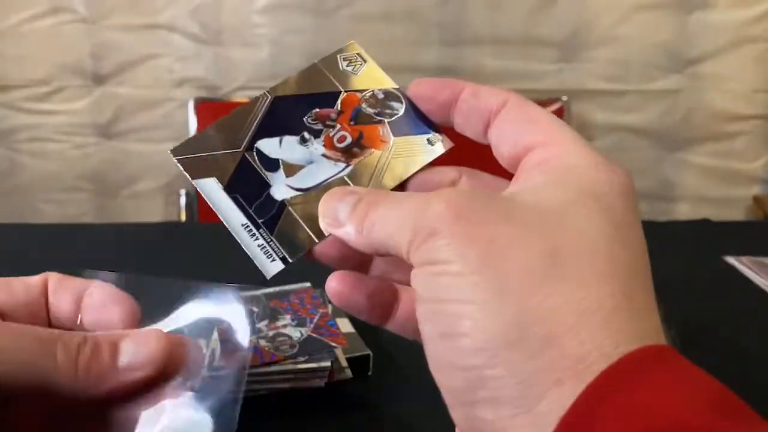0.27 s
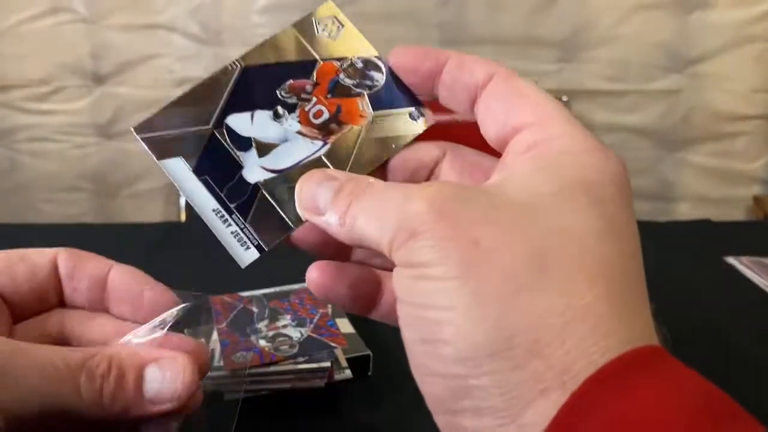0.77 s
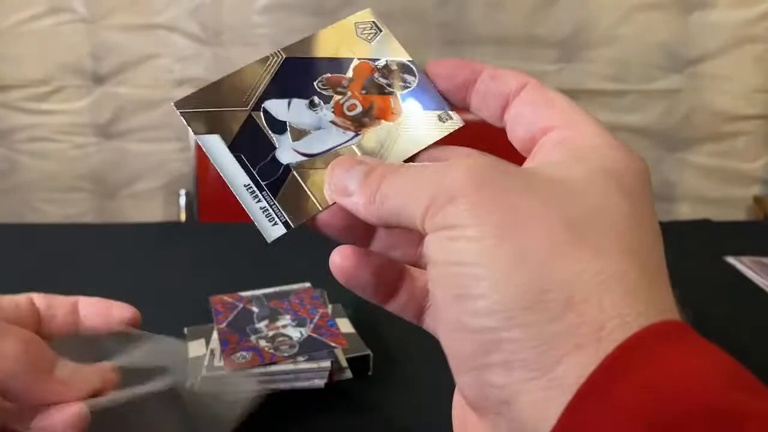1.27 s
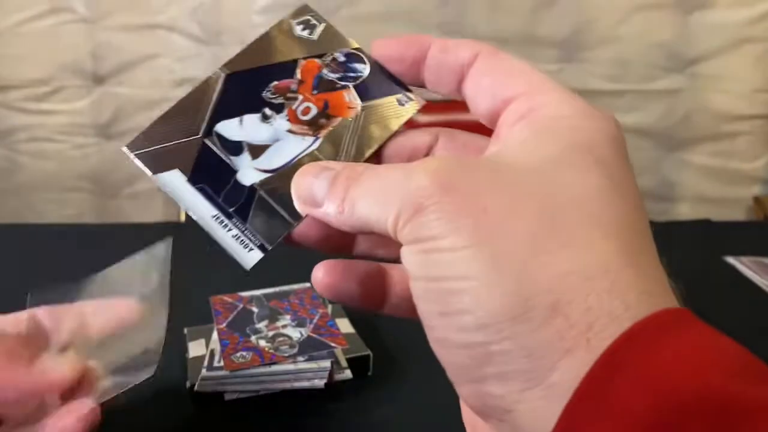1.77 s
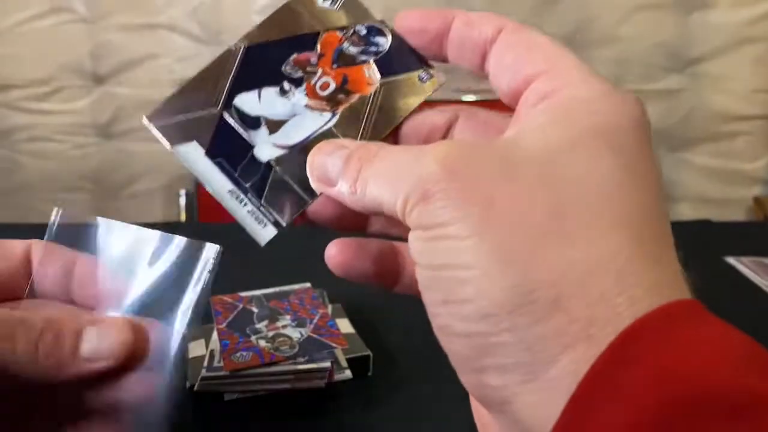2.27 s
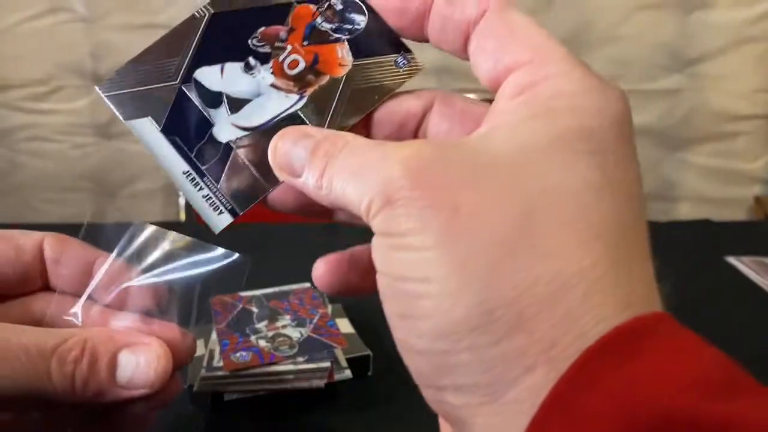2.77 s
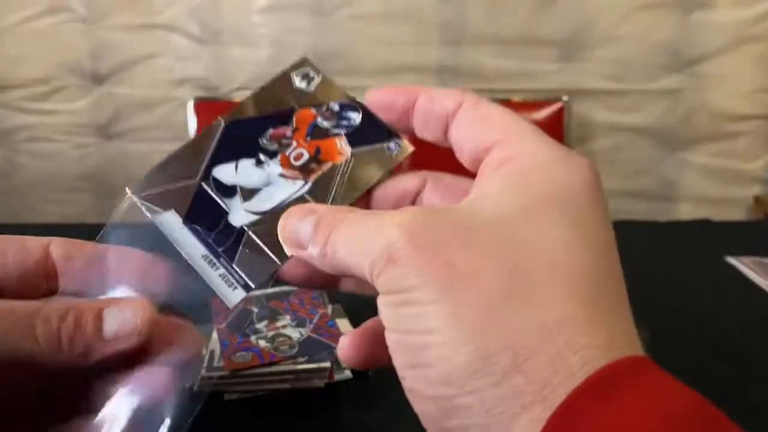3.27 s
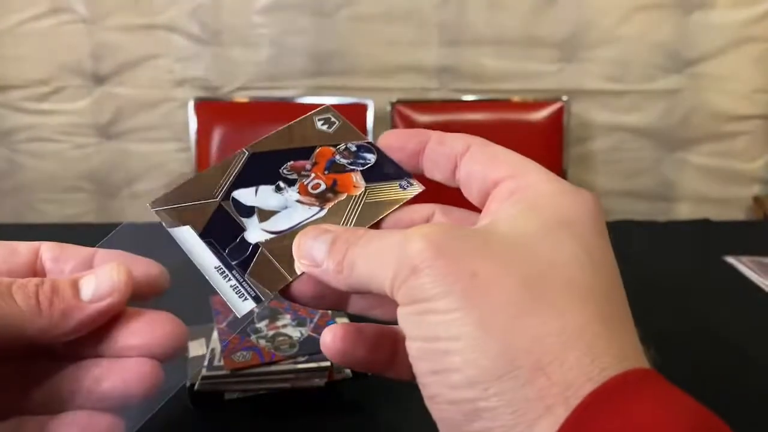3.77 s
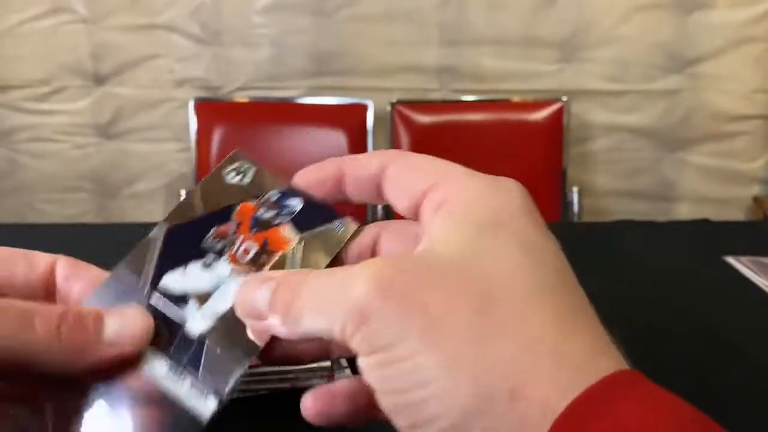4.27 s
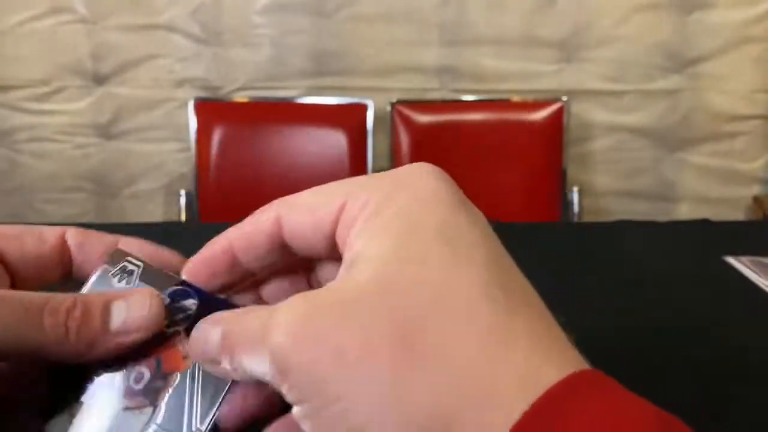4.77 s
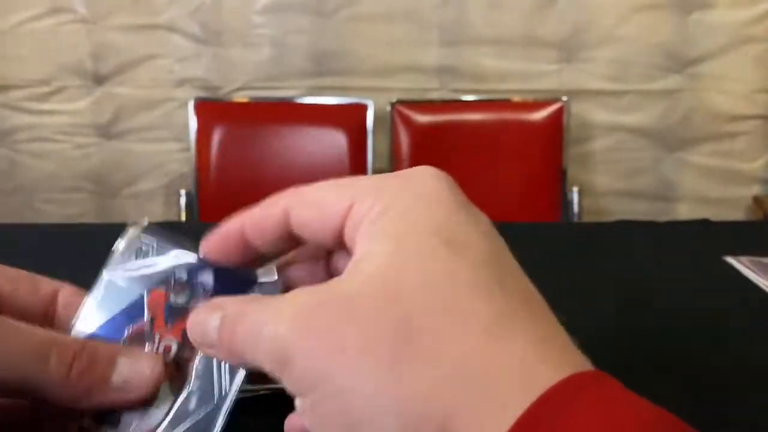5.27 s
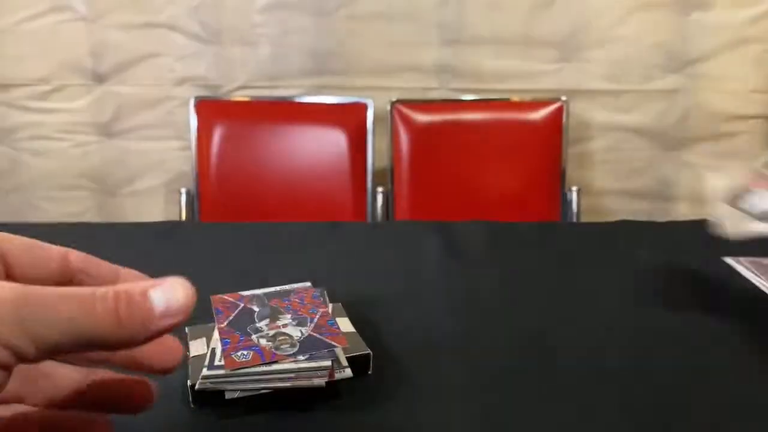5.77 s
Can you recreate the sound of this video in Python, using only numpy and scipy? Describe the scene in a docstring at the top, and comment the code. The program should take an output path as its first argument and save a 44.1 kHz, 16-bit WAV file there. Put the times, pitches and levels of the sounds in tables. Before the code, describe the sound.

Close, crisp plastic film pops and rustles, eases to faint crackle, a card edge clicks into it, and a sleeve brushes over tablecloth at the end.

```python
"""A table in a quiet room: a thin plastic card sleeve is fingered open close to a phone and a card slid in.
Creases snap, fingertips tap dully, the card's edge catches and film crackles: short noise bursts in three
bands, with a room tail. Strokes of rubbing film are patchy noise that swells and fades; wrists bump the table
as sagging sine booms. At the end a forearm sweeps over the tablecloth, in drifting noise; a low room noise
hums underneath."""
import sys
import numpy as np
from scipy import signal
from scipy.fft import rfft, irfft, next_fast_len
from scipy.io import wavfile
from scipy.ndimage import uniform_filter1d, map_coordinates

SR = 44100
rng = np.random.default_rng(int(sys.argv[2]) if len(sys.argv) > 2 else 0)


def transcribe(signal):
    """Save signal, clipped to [-1, 1], as a 16-bit WAV file at the path in sys.argv[1]."""
    frames = np.atleast_2d(signal).T
    limited = np.clip(frames, -1, 1)
    pcm = np.round(limited * 32767).astype(np.int16)
    wavfile.write(sys.argv[1], SR, pcm)


N = 264878

# Clicks near the phone: creases snapping, and a few dull fingertip taps. Each row: start in seconds,
# body level in dB, crisp over body in dB, time to fall 60 dB in ms (held within 1 to 40 ms when played),
# low over body in dB.
SNAPS_AND_TAPS = [(0.29, -48, 11, 11, -1), (0.3035, -22.5, 4.5, 5.6, -5), (0.3139, -41, 0, 9, -2),
                  (0.357, -59, -16, 10, 14), (0.4074, -44, 1.5, 2.7, 6), (0.461, -15, 1.5, 5, -16.5),
                  (0.4686, -38.5, -14, 11, 6), (0.5685, -23.5, 13, 8.8, -10), (0.583, -24, 10, 6.3, -9),
                  (0.585, -26.5, 6, 4.7, -15), (0.5876, -29, -8, 7.8, -9), (0.5907, -24, 14.5, 1.7, 0),
                  (0.6251, -36.5, -2, 7.3, -10), (0.6701, -42.5, -7, 6.9, -11), (0.714, -31, 10, 7.3, -12),
                  (0.7172, -12, 0.5, 7.2, -7.5), (0.7254, -45, 13, 12, -10), (0.9834, -35, -1.5, 9.5, -8.5),
                  (1.018, -43.5, -5, 18, 4.5), (1.0282, -32.5, 0, 0.86, -5.5), (1.047, -46, -6, 15, 6.5),
                  (1.0593, -29, 2.5, 8.1, -2.5), (1.141, -39.5, -6, 3.2, -5), (1.1695, -41, -4, 20, -1),
                  (1.2434, -39, 1, 14, 4.5), (1.2464, -28.5, -6, 1.6, -8.5), (1.272, -39, -21, 11, -5.5),
                  (1.4469, -44, 2, 59, 4), (1.455, -26.5, 1, 24.5, -1.5), (1.5496, -37, -21.5, 10.5, -6.5),
                  (1.6037, -48.5, -2, 7.1, 0.5), (1.6607, -33.5, -4.5, 0.83, -9.5),
                  (1.8024, -58, 14.5, 22, 8), (2.02, -58, 7, 9.5, 9), (2.062, -46, -23, 3.8, -1),
                  (2.2235, -36.5, -9, 8, -5.5), (2.2481, -47.5, -1.5, 34, 1.5), (2.3348, -61, 1, 22, 14),
                  (2.4696, -36, -4, 17, 0.5), (2.479, -46, 3.5, 3.7, 4), (2.4836, -24, -5.5, 3.3, -17),
                  (2.4896, -26, -5, 5.2, -10.5), (2.5077, -37, -15, 7.4, -8),
                  (2.6595, -35.5, -11, 6.9, -11.5), (2.738, -40, -18, 9.2, -6.5),
                  (2.7597, -39.5, -15, 7.6, -8), (3.07, -61.5, 9, 3.8, -3.5), (3.108, -54, 2, 5.2, -0.5),
                  (3.126, -35.5, -8.5, 9.1, -9), (3.3509, -57, 10, 10.5, 10), (3.368, -57, -5.5, 11, 4.5),
                  (3.408, -61, -1.5, 8.4, 19), (3.802, -58, 4.5, 4.2, 2), (4.027, -58, -0.5, 2.7, -2),
                  (4.129, -33.5, -1.5, 9.3, 2), (4.178, -41, 4, 4.8, -13), (4.801, -58, -7, 6.1, 3),
                  (4.828, -55.5, 3, 14, 0.5), (4.8773, -50, -2, 44, -11), (5.0341, -51.5, -4.5, 28, 0.5),
                  (5.088, -52, -9, 6, -7.5), (5.227, -49, 5, 15, -2), (5.234, -54, 11, 5.5, -7),
                  (5.2512, -45.5, 15, 14, 3), (5.3602, -49.5, 3, 17, -12), (5.3652, -29, 9, 9, 2.5),
                  (5.3777, -60.5, 26, 17, -5), (5.5119, -42, -5.5, 47, 0.5), (5.9178, -49, -8, 9, 12.5)]
# The card's edge catching in the sleeve. Each row: start in seconds, body level in dB, time to fall 60 dB in ms.
EDGE_CATCHES = [(4.2437, -44.5, 2.4), (4.283, -19, 1.5), (4.3123, -35, 4), (4.336, -35.5, 4),
                (4.3588, -40, 3.6), (4.3651, -34, 5)]
CATCH_CRISP_DB, CATCH_LOW_DB = -3, -46  # over body
# Runs of dense fine crackle in the film. Each row: start in seconds, length in seconds before the die-away,
# body level in dB, crisp over body in dB, low over body in dB.
CRACKLE_RUNS = [(0.581, 0.011, -32.5, 5, -1), (3.117, 0.0032, -56, 1, 6.5), (3.145, 0.0058, -42, -11, -4),
                (3.1785, 0.02, -52, 7.5, 3), (3.339, 0.012, -66.5, 14, 9), (4.193, 0.012, -41.5, 2, -9),
                (4.255, 0.021, -47.5, -4, -31), (4.2844, 0.0055, -29, -5, -23.5),
                (4.294, 0.022, -44, -3, -25), (4.326, 0.011, -40, -2, -17), (4.344, 0.0055, -37, -7, -11),
                (4.368, 0.0236, -46, 0, -11)]
# Strokes of film on skin or card. Each row: peak time in seconds, hiss level in dB, air over hiss in dB,
# scrape over hiss in dB, rise over 20 dB in seconds, fall over 20 dB in seconds.
FILM_STROKES = [(0.02, -58, -3.5, -8, 0.16, 0.098), (0.16, -61.5, 0, 2.5, 0.085, 0.08),
                (0.262, -57.5, -3.5, -4, 0.19, 0.17), (0.45, -72.5, -8, 11, 0.26, 0.7),
                (0.584, -39, -10, 10.5, 0.0094, 0.022), (0.76, -57.5, -17, -17.5, 0.11, 0.078),
                (0.95, -63.5, 1.5, -16, 0.074, 0.066), (1.034, -56.5, -1, -0.5, 0.12, 0.049),
                (1.14, -54, -2, -8, 0.052, 0.072), (1.232, -45.5, 0, -9, 0.066, 0.038),
                (1.3, -60.5, -0.5, -1, 0.16, 0.27), (1.435, -61, 6, 2, 0.017, 0.046),
                (1.499, -55, 3.5, -3, 0.11, 0.1), (1.648, -54, 3.5, -6, 0.06, 0.19),
                (1.748, -54, -3, -12, 0.038, 0.051), (1.879, -54.5, -1.5, -9, 0.11, 0.098),
                (2.002, -57, -5, -9.5, 0.049, 0.065), (2.1, -61, -0.5, -0.5, 0.062, 0.26),
                (2.25, -50, -12, -15, 0.088, 0.037), (2.32, -69.5, -4.5, -1, 0.25, 0.52),
                (2.483, -45.5, -12, 3, 0.015, 0.038), (2.58, -67.5, -2, -6.5, 0.14, 0.18),
                (2.986, -68, -2, 3, 0.027, 0.03), (3.08, -68.5, -7, -8.5, 0.1, .08),
                (3.16, -63, -1, 3.5, 0.079, 0.15), (3.345, -65, 18, -3, 0.017, 0.015),
                (3.46, -67.5, 0, 0.5, 0.06, 0.095), (4.09, -72.5, -3.5, -5, 0.31, 0.21),
                (4.194, -57.5, -1, -0.5, 0.11, 0.1), (4.291, -51, -7, -3, 0.1, 0.14),
                (4.36, -51.5, -4, -1, 0.14, 0.067), (4.53, -59, 0, -2.5, 0.26, 0.2),
                (4.71, -62.5, 1, -1.5, 0.31, 0.11), (4.877, -55.5, -15.5, 3.5, 0.033, 0.022),
                (5.24, -58.5, 2, -1.5, 0.097, 0.061)]
# Wrists bumping the table. Each row: start in seconds, level in dB, pitch it settles to in Hz,
# time to fall 60 dB in seconds.
TABLE_BUMPS = [(0.308, -33.5, 72, 0.031), (0.468, -37, 85.5, 0.09), (0.591, -30, 83, 0.089),
               (1.06, -41.5, 79, 0.14), (1.555, -36, 70, 0.22), (2.224, -49, 80, 0.25),
               (2.487, -35.5, 59, 0.085), (3.155, -45, 105.5, 0.16), (3.202, -40.5, 72.5, 0.086),
               (4.497, -48.5, 70.6, 0.22), (5.04, -46.5, 74.9, 0.25), (5.13, -50.5, 82, 0.35),
               (5.419, -42, 104, 0.13), (5.527, -45.5, 59, 0.17)]
# Hands stirring the table. Each row: time in seconds, level in dB.
HAND_STIR = [(0, -69), (0.95, -68), (1.08, -56.5), (1.2, -68), (2.5, -68.5), (3.6, -72.5), (5.3, -65.5),
             (5.45, -57.5), (6.01, -55.5)]
# Forearm on the cloth. Each row: time in seconds, level in dB.
FOREARM_SWEEP = [(5.36, -73), (5.45, -56), (5.55, -52), (5.75, -51), (6.01, -53)]

# Spectrum shapes of the three click bands. Each row: frequency in Hz, relative density in dB per Hz.
CRISP_SPECTRUM = [(2500, -38), (6000, -5), (8600, -4), (13000, -13.5), (17000, -15), (20000, -35.5)]
BODY_SPECTRUM = [(600, -39.5), (2200, -10.5), (3200, 0.5), (5000, -5), (7500, -36)]
LOW_SPECTRUM = [(60, -49), (250, -4), (600, 8), (1200, 10), (1900, 11), (3500, -35.5)]
# Spectrum shapes of the rubbing film. Each row: frequency in Hz, relative density in dB per Hz.
HISS_SPECTRUM = [(3200, -23), (5000, -1.5), (8500, 1), (12000, -24.5)]
AIR_SPECTRUM = [(7000, -27.5), (10000, -12), (17000, -14.5), (20000, -35)]
SCRAPE_SPECTRUM = [(400, -5), (1500, -4.5), (3300, 0.5), (4600, -4), (6500, -24)]
# Spectrum shapes of table rumble, cloth and quiet room. Each row: frequency in Hz, relative density in dB per Hz.
TABLE_SPECTRUM = [(25, -24), (60, -8), (190, -3), (320, -4.5), (900, -23.5), (2000, -79.5)]
CLOTH_SPECTRUM = [(500, -5), (1500, 0), (4500, -1), (5500, -4), (10200, -6), (16000, -15)]
ROOM_SPECTRUM = [(15, -44), (25, -6.5), (64, 1), (363, -19.5), (416, -20), (1020, -19.5), (8830, -29.5),
                 (16000, -33)]
# Decay of the room's answer. Each row: frequency in Hz, time to fall 60 dB in seconds.
WALL_DECAY = [(300, 0.39), (3000, 0.091), (12000, 0.088)]

LEAD_DB, LEAD_MS = -29, 8  # strain before a click: level under it, time to grow 60 dB
CRACKS_PER_S, CRACK_SPREAD_DB = 14000, 3
CRACKLE_T60_MS, SAG_DB_PER_S = 7.1, 200.5
TICKS_PER_S, TICK_DB, TICK_SPREAD_DB = 35, -60, 3
ROUNDNESS = 1.4  # 1 is a pointed stroke, 2 a rounded one
SETTLE_DB, SETTLE_T60_S = -41.5, 0.19  # rustle after a click: level over its crisp level, time to fall 60 dB
WALLS_DB, ROOM_DB = -23.0, -63.5
TOP_HZ = 16150  # upper band limit of the phone


def clicks():
    """Each crease, tap or caught edge starts in one sharp step and rattles out; band levels set crisp or dull."""
    lead = 300  # samples of strain before the step
    t = np.arange(-lead, 1200) / SR
    bands = np.zeros((3, N + len(t)))
    events = []
    for s, db, crisp_db, t60_ms, low_db in SNAPS_AND_TAPS:
        events.append((s, db + crisp_db, db, db + low_db, t60_ms))
    for s, db, t60_ms in EDGE_CATCHES:
        events.append((s, db + CATCH_CRISP_DB, db, db + CATCH_LOW_DB, t60_ms))
    for s, *levels_db, t60_ms in events:
        strain_db = LEAD_DB + 60 * t / (LEAD_MS / 1000)
        rattle_db = -60 * t / (np.clip(t60_ms, 1, 40) / 1000)
        burst = amp(np.where(t < 0, strain_db, rattle_db)) * rng.standard_normal(len(t))
        burst[lead] = -3.5  # the sharp step itself
        burst /= np.sqrt(uniform_filter1d(burst ** 2, size=60).max())  # loudest moment at rms 1
        start = round(s * SR) - lead
        bands[:, start:start + len(t)] += amp(levels_db)[:, None] * burst
    crisp, body, low = bands[:, :N] + crackles()
    return coloured(crisp, CRISP_SPECTRUM) + coloured(body, BODY_SPECTRUM) + coloured(low, LOW_SPECTRUM)


def crackles():
    """Crisp, body and low drive of many tiny cracks in a row, which weaken, then die away."""
    t, bands = np.arange(N) / SR, np.zeros((3, N))
    happens = rng.random((3, N)) < CRACKS_PER_S / SR
    size = amp(CRACK_SPREAD_DB * rng.standard_normal((3, N)))
    cracks = happens * size * rng.standard_normal((3, N))
    cracks /= np.sqrt(np.abs(uniform_filter1d(cracks ** 2, size=200, axis=1)))
    for s, length_s, db, crisp_db, low_db in CRACKLE_RUNS:
        sag_db = SAG_DB_PER_S * np.abs(t - s)
        die_db = 60 * np.maximum(t - s - length_s, 0) / (CRACKLE_T60_MS / 1000)
        levels = amp(db + np.array([[crisp_db], [0], [low_db]]))
        bands += levels * (t > s) * amp(-sag_db - die_db) * cracks
    return bands


def ticks():
    """Tiny creases give way at random, each with its own share of crisp and body."""
    when, chance, crisp_share = rng.random((300, 3))[:int(TICKS_PER_S * N / SR)].T
    gain = amp(TICK_DB - TICK_SPREAD_DB * np.log(chance + 0.00078))  # a few stand well above the rest
    place = (when * N).astype(int)
    crisp = np.bincount(place, gain * crisp_share, N)
    body = np.bincount(place, gain * (1 - crisp_share), N)
    return coloured(crisp, CRISP_SPECTRUM) + coloured(body, BODY_SPECTRUM)


def rubbing():
    """Film sliding on skin and card: smooth when light, gritty with stick and slip when it scrapes hard."""
    hiss_db, air_db, scrape_db = strokes()
    pressure = np.clip((scrape_db + 68.5) / 18, .15, 1)
    slips = amp(pressure * (0.99 * wobble(130) + 5.5 * wobble(1500)))
    slips /= np.sqrt(np.abs(uniform_filter1d(slips ** 2, size=1200)))  # grit without a change of level
    hiss = amp(hiss_db) * coloured(slips * patchy(3.2), HISS_SPECTRUM)
    air = amp(air_db) * coloured(slips * patchy(3.2), AIR_SPECTRUM)
    scrape = amp(scrape_db) * coloured(slips * patchy(3.2), SCRAPE_SPECTRUM)
    return hiss + air + scrape


def strokes():
    """Levels of hiss, air and scrape in dB: strokes swell and fade; hiss and air settle after each snap or tap."""
    t, power = np.arange(N) / SR, np.full((3, N), 1e-12)
    for s, db, air_db, scrape_db, rise_s, fall_s in FILM_STROKES:
        away = np.maximum((s - t) / rise_s, (t - s) / fall_s)
        swell_db = db - 20 * away ** ROUNDNESS
        power += amp(swell_db + np.array([[0], [air_db], [scrape_db]])) ** 2
    for s, db, crisp_db, *_ in SNAPS_AND_TAPS:
        start = round(s * SR)
        after = t[start:start + SR // 4] - s
        settle_db = db + crisp_db + SETTLE_DB - 60 * after / SETTLE_T60_S
        power[:2, start:start + SR // 4] += amp(settle_db) ** 2
    return 10 * np.log10(power)


def table():
    """The top booms at each bump, its pitch sagging, and rumbles while the hands move."""
    booms, t = np.zeros(N + SR), np.arange(SR // 2) / SR
    for s, db, hz, t60 in TABLE_BUMPS:
        cycles = np.cumsum(hz * (1 + 3.6 * np.exp(-t / 0.0025))) / SR
        onset = 1 - np.exp(-t / 0.00077)
        start = round(s * SR)
        booms[start:start + len(t)] += amp(db - 60 * t / t60) * onset * np.sin(2 * np.pi * cycles)
    rumble = amp(curve(HAND_STIR) + wobble(14)) * coloured(patchy(2.2), TABLE_SPECTRUM)
    return booms[:N] + rumble


def sweep():
    """A shirt sleeve dragged over the cloth: broad noise with an unsteady level."""
    moving = np.arange(N) > FOREARM_SWEEP[0][0] * SR
    return moving * amp(curve(FOREARM_SWEEP) + wobble(44)) * coloured(patchy(0.63), CLOTH_SPECTRUM)


def walls(x):
    """The room's answer to x: a noise tail in which each frequency dies at its own speed."""
    hz, t, z = signal.stft(rng.standard_normal(SR // 2), SR, nperseg=256)
    decay = amp(-60 * t / along(WALL_DECAY, hz)[:, None])
    tail = signal.istft(z * decay, SR, nperseg=256)[1]
    delayed = np.pad(x, (40, 0))  # 40 samples, about 0.9 ms
    return signal.fftconvolve(delayed, tail / np.linalg.norm(tail))[:N]


def quiet_room():
    """The hum under everything: mostly low noise that drifts slowly in level."""
    return amp(ROOM_DB + wobble(3)) * coloured(patchy(0.96), ROOM_SPECTRUM)


def amp(db):
    """dB to gain."""
    return 10 ** (np.asarray(db) / 20)


def unit(x):
    """x at rms 1."""
    return x / np.sqrt(np.mean(x ** 2) + 1e-20)


def along(points, hz):
    """(Hz, value) points read on a log frequency axis."""
    f, v = np.transpose(points)
    return np.interp(np.log(hz + 1), np.log(f + 1), v)


def curve(rows):
    """(seconds, value) rows joined by straight lines, one value per sample."""
    s, values = np.transpose(rows)
    return np.interp(np.arange(N) / SR, s, values)


def wobble(rate):
    """A smooth random curve, rate knots a second."""
    knots = rng.standard_normal(int(N * rate / SR) + 4)
    return map_coordinates(knots, [np.arange(N) * rate / SR])


def coloured(x, spectrum):
    """x through a causal minimum-phase filter of the given spectrum that keeps the power of white noise."""
    size = next_fast_len(N + 8192)
    gain = amp(along(spectrum, np.fft.rfftfreq(size, 1 / SR)))
    cepstrum = irfft(np.log(unit(gain) + 1e-6), size)
    cepstrum[1:size // 2] *= 2  # fold the backward half onto the forward half
    cepstrum[size // 2 + 1:] = 0
    return irfft(rfft(x, size) * np.exp(rfft(cepstrum)), size)[:N]


def patchy(depth_db):
    """Noise whose gain drifts in patches of time and frequency."""
    z = signal.stft(rng.standard_normal(N), nperseg=256)[2]
    field = uniform_filter1d(rng.standard_normal(z.shape), size=7, axis=0)  # across frequency
    field = uniform_filter1d(field, size=16, axis=1)  # across time
    return signal.istft(z * amp(depth_db * unit(field)), nperseg=256)[1][:N]


def scene():
    """All sources at one microphone; clicks, crackle runs and ticks get the room's answer, the others do not."""
    sharp = clicks() + ticks()  # clicks() holds the creases, taps, catches and crackle runs
    answer = amp(WALLS_DB) * walls(sharp)
    return (sharp + answer + rubbing() + table() + sweep() + quiet_room())[None]


def record(dry):
    """The phone rounds off the loudest peaks and keeps nothing above its band limit."""
    rounded = dry / (1 + np.abs(dry / .9) ** 6) ** (1 / 6)
    edge = np.clip((TOP_HZ - np.fft.rfftfreq(N, 1 / SR)) / 500, 0, 1)  # fades over the last 500 Hz
    return irfft(rfft(rounded) * np.sin(edge * np.pi / 2) ** 2, N)


dry = scene()
out = record(dry)
transcribe(out)
```